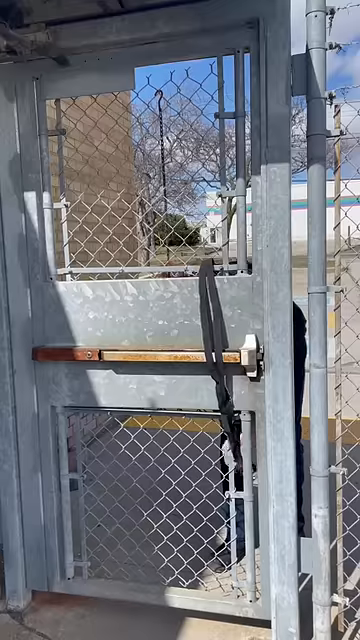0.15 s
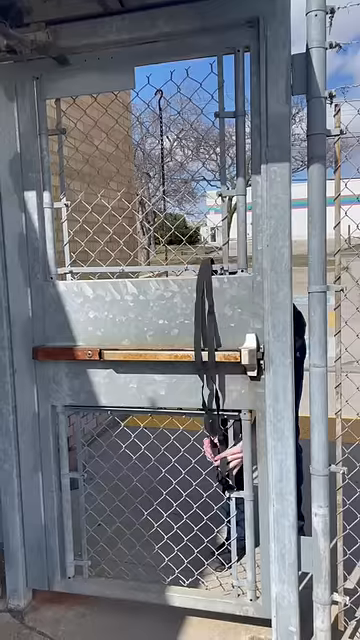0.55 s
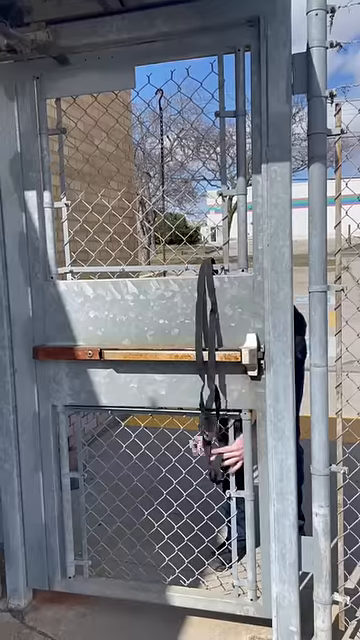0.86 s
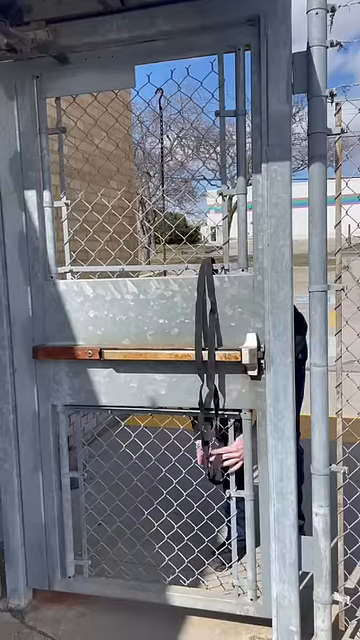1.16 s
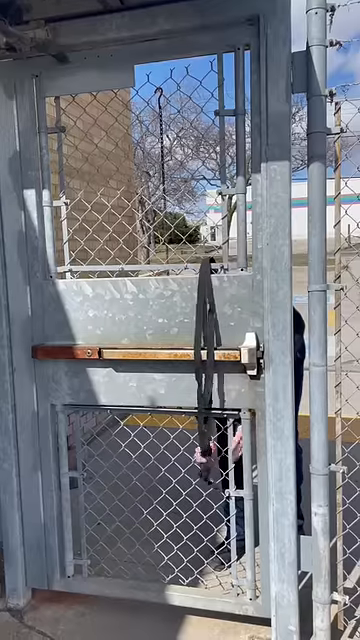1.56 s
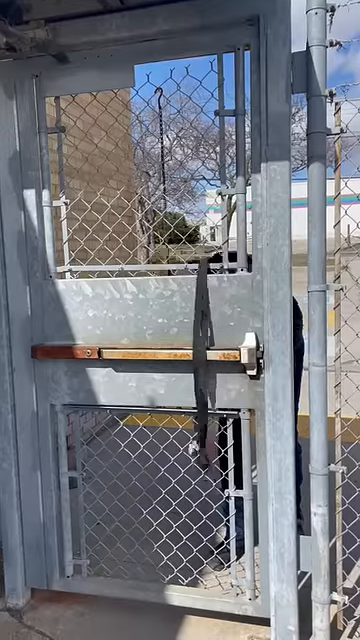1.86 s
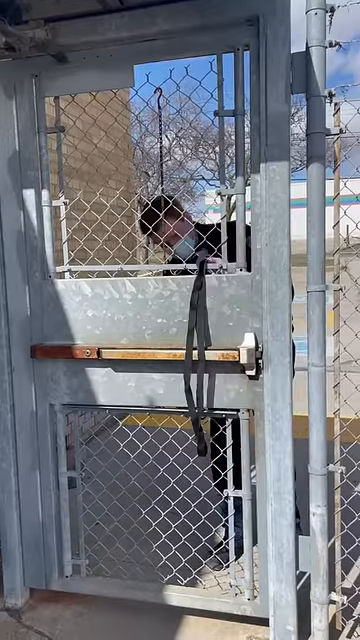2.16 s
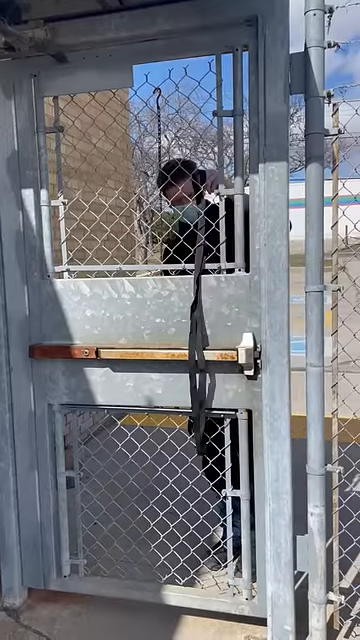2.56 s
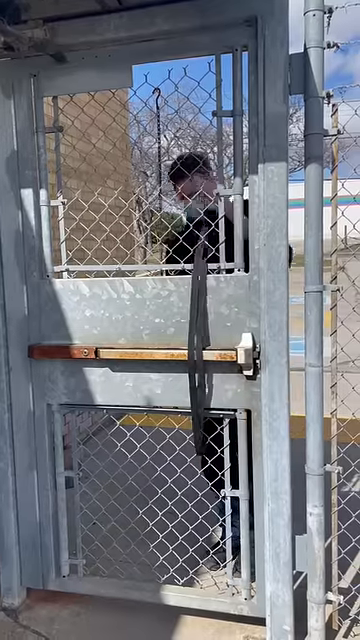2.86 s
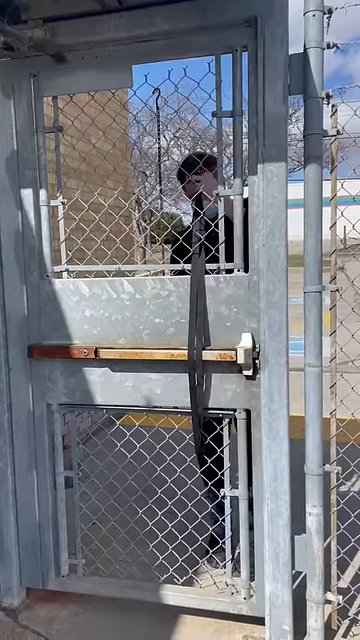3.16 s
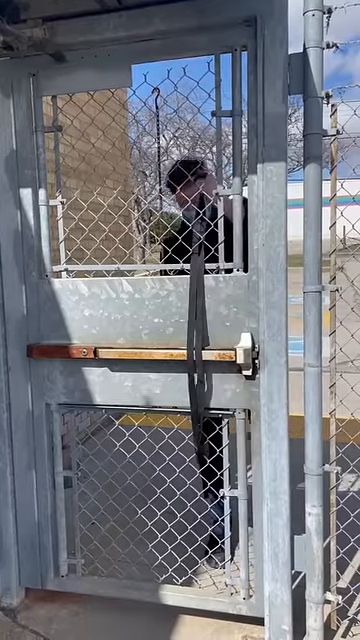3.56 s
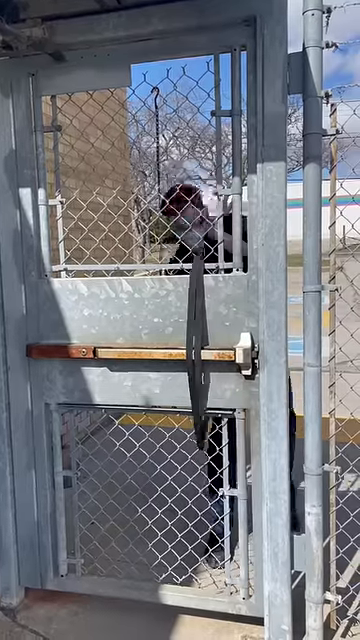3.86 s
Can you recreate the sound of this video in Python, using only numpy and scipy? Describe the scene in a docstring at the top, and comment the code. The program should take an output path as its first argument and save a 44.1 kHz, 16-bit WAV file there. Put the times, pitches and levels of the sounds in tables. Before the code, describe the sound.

A steel mesh gate is tugged by a strap outdoors. From 0 to 3.6 seconds, webbing rustles and rubs faintly on wire, with light ticks and plucks, sharper snaps near 2.7 and 3.06, and tiny metallic tinkles around 2.5 and 3.1. At 3.63 the push bar clanks; from 3.83 the gate crashes loudly, ringing and rattling to the end. Low wind gusts thump the microphone over faint traffic.

```python
"""A strap worked through the wire mesh of a steel gate: random catches make it rustle, dull noise makes it rub.
Single clicks tick the mesh, tinkle a small metal fitting and pluck wires. Then the strap pulls tight:
the push bar clanks and the gate crashes, as random chatter and distinct strikes ring mesh, frame and sheet.
Gusts thump on the microphone as lumpy low noise, over a patchy noise of far traffic outdoors."""
import sys
import numpy as np
from scipy import signal
from scipy.fft import rfft, irfft
from scipy.io import wavfile

SR = 44100
rng = np.random.default_rng(int(sys.argv[2]) if len(sys.argv) > 2 else 0)


def output_pcm(signal):
    """Save a mono or channel-first signal as 16-bit PCM at the path in sys.argv[1].

    Samples are clipped to [-1, 1] before scaling.
    """
    pcm = np.clip(np.atleast_2d(signal).T, -1, 1) * 32767
    wavfile.write(sys.argv[1], SR, np.round(pcm).astype(np.int16))


N = 176400  # length in samples: 4 s

# Strap dragging on the mesh: (time [s], level of the catches [dB], top setting for brighten [dB],
# level of the dull rub [dB])
STRAP_DRAG = [(0.0, -64, -20, -52), (0.06, -67, -13, -62), (0.16, -65, -10.5, -60), (0.18, -59, 1, -74),
              (0.21, -65, -5, -93), (0.43, -60.5, -14, -61.5), (0.72, -68.5, -17, -59),
              (0.94, -74, -18, -62), (0.96, -59.5, -14, -55.5), (1.02, -56.5, -21, -60.5),
              (1.08, -63.5, -29, -58), (1.3, -83, -21, -62), (1.35, -65.5, -0.5, -72),
              (1.39, -60, -12, -66), (1.48, -61.5, -11, -59), (1.53, -54.5, -6, -78), (1.56, -57, -17, -57),
              (1.67, -55, -13, -54.5), (1.74, -57, -12, -58.5), (1.85, -52.5, -16.5, -48),
              (2.09, -60.5, -19.5, -61), (2.15, -58.5, -17.5, -56.5), (2.35, -60.5, -15, -56),
              (2.49, -52.5, -20, -57.5), (2.66, -60.5, -10, -57), (2.68, -46, -14, -61),
              (2.69, -54.5, -12, -70), (2.74, -57, -15, -53), (2.78, -66, -8, -53.5),
              (2.86, -57.5, -15, -55), (2.99, -62, -17, -55.5), (3.0, -57.5, -20, -46.5),
              (3.04, -61.5, -4.5, -55.5), (3.06, -52.5, -18, -55), (3.08, -59, 8.5, -50),
              (3.22, -69, -13, -66), (3.39, -66, -5, -53), (3.41, -71, -7.5, -62.5), (3.59, -61, -9, -53.5),
              (3.62, -69, 11, -71), (3.63, -38, -13, -46)]
# Colour of the catches: (frequency [Hz], level per Hz [dB])
STRAP_COLOUR = [(300, 13), (800, 6), (1500, 4.5), (2500, -4), (4000, -9.5), (5500, -1), (7500, -4),
                (10000, -12), (13000, -23.5), (16000, -20.5)]
# Wires singing under the strap: (frequency [Hz], width [Hz], level [dB])
SINGING_WIRES = [(2070, 42, 8), (2360, 58, 9), (2770, 69, 4), (3012, 86, 5), (3650, 54, 1),
                 (4680, 13.3, 2.5), (5030, 110, -1), (5165, 99, -2)]
CATCHES_PER_S, CATCH_SPREAD_DB, CATCH_TRIM_DB, STRAP_PATCHY_DB = 8000, 3.0, 1, 2.2
STRAP_RING_DB, STRAP_RING_T60_S = -2, 0.068
SINGING_DB, SINGING_WANDER_DB = 4.5, 3.5
RUB_TRIM_DB, RUB_LOW_HZ, RUB_HIGH_HZ = -1.5, 322, 1550


def rustle():
    """Webbing fibres catch the wire thousands of times a second and ring it faintly; the flat strap rubs duller."""
    db, top_db, rub_db = in_time(STRAP_DRAG)
    catches = amp(db + CATCH_TRIM_DB) * grains(CATCHES_PER_S, CATCH_SPREAD_DB)
    hiss = np.std(catches) * unit(bands(catches, STRAP_COLOUR, STRAP_PATCHY_DB))
    hiss = hiss + amp(STRAP_RING_DB) * mesh(catches, STRAP_RING_T60_S)
    for hz, width_hz, level_db in SINGING_WIRES:
        gain = amp(SINGING_DB + level_db + SINGING_WANDER_DB * drift(5.1))
        hiss += gain * band(catches, hz - width_hz / 2, hz + width_hz / 2)
    rub_noise = band(rng.standard_normal((2, N)), RUB_LOW_HZ, RUB_HIGH_HZ)
    return brighten(hiss, top_db) + amp(rub_db + RUB_TRIM_DB) * unit(rub_noise)


# Strap ticking the wire: (time [s], level before the trim [dB])
STRAP_TICKS = [(0.174, -50.5), (0.4204, -51), (0.5077, -48.5), (0.9512, -59), (2.674, -42.5), (2.7266, -43),
               (3.0015, -53), (3.0586, -41.5), (3.0937, -44), (3.247, -52.5), (3.4534, -59), (3.5332, -56),
               (3.5577, -50), (3.606, -49)]
TICK_T60_S, TICK_TRIM_DB = 0.028, 20


def ticks():
    """Each tick is one click that sets the mesh ringing at one of two places."""
    return mesh(at_times(STRAP_TICKS, TICK_TRIM_DB), TICK_T60_S, count=2)


# Touches on the small metal fitting: (time [s], level before the trim [dB])
FITTING_TOUCHES = [(2.499, -39), (3.0794, -34.5), (3.4535, -51)]
# Ringing modes of the fitting: (frequency [Hz], level [dB], time to fade by 60 dB [s])
FITTING_MODES = [(7040, -8, 0.3), (7500, 3, 0.13), (9600, -10, 0.073), (10200, -21, .12),
                 (10280, -1, 0.081), (12800, -8, .1), (13200, -10, .1), (15300, 15, 0.17)]
TINKLE_TRIM_DB = -13
REBOUND_S, REBOUND_DB = 0.03, -13  # the fitting touches again, weaker


def tinkles():
    """Each touch and its rebound ring every mode of the fitting with a strength of its own."""
    rebounds = np.array(FITTING_TOUCHES) + [REBOUND_S, REBOUND_DB]
    touches = np.concatenate([FITTING_TOUCHES, rebounds])
    out = 0
    for hz, db, t60 in FITTING_MODES:
        uneven = rng.normal(0, 2.5, (len(touches), 1)) * [0, 1]  # changes level, not time
        out = out + ring(at_times(touches + [0, db] + uneven, TINKLE_TRIM_DB), hz, t60)
    return out


# Single wires plucked: (time [s], level before the trim [dB], frequency [Hz])
PLUCKS = [(0.174, -46, 3600), (1.6217, -47.5, 3610), (2.1244, -55, 4940), (2.1594, -52, 4970),
          (2.4494, -50, 5230)]
PLUCK_T60_S, PLUCK_TRIM_DB = 0.11, -5


def plucked_wires():
    """Each plucked wire rings one short note."""
    return sum(ring(at_times([(s, db)], PLUCK_TRIM_DB), hz, PLUCK_T60_S) for s, db, hz in PLUCKS)


# The bar clanks: (time [s], mesh level [dB], frame level [dB], sheet level [dB], top setting for brighten [dB])
BAR_CLANKS = [(3.62, -55, -59, -49, -12), (3.63, -51, -54, -40, -14), (3.634, -41.5, -28.5, -38, -11),
              (3.652, -41.5, -31.5, -41, -20), (3.676, -51, -44, -29.5, -18),
              (3.718, -51.5, -45, -35, -7.5), (3.746, -54, -37, -32, -7), (3.782, -43, -50, -46, -6),
              (3.794, -44, -45, -42, -4), (3.804, -53, -45, -37, -2), (3.824, -44.5, -38, -46, -17)]
# The gate crashes: (time [s], mesh level [dB], frame level [dB], sheet level [dB], top setting for brighten [dB])
GATE_CRASH = [(3.826, -38, -44, -43, -15), (3.832, -31, -22.5, -35, -9), (3.854, -15.5, -21.5, -21, -12.5),
              (3.875, -22.5, -24, -22, -18), (3.902, -30, -24, -36, -17.5), (3.908, -23, -24, -24, -11.5),
              (3.93, -20, -40, -27.5, -19), (3.948, -23.5, -30, -31, -12.5),
              (3.966, -25.5, -24, -42, -18.5), (4.0, -34.5, -21.5, -45, -22)]
# Distinct impacts in the shaking: (time [s], level before the gains below [dB], pitch of the clang [Hz])
IMPACTS = [(3.635, -34, 4890), (3.851, -14, 5240), (3.862, -16.5, 5200), (3.872, -16, 3590),
           (3.888, -14.5, 2000), (3.911, -7.5, 6160), (3.934, -10.5, 5300), (3.939, -6.5, 5160),
           (3.941, -5, 5600), (3.947, -5.5, 3590), (3.956, -12.5, 3610)]
PULL_S = BAR_CLANKS[0][0]  # the strap pulls tight
SHAKE_HITS_PER_S, SHAKE_SPREAD_DB = 4000, 2.5
WIRE_T60_S, WIRE_TRIM_DB, IMPACT_MESH_DB = 0.023, 2, -3.5
BODY_FRAME_DB, BODY_SHEET_DB = 2.5, 14.5  # broad clatter of the frame; boom of the sheet


def gate():
    """Loose parts chatter and strike while the gate shakes, driving mesh, frame and sheet."""
    wire_db, frame_db, sheet_db, top_db = in_time(list(BAR_CLANKS) + list(GATE_CRASH))
    chatter = (np.arange(N) >= PULL_S * SR) * grains(SHAKE_HITS_PER_S, SHAKE_SPREAD_DB)
    impacts = at_times(np.array(IMPACTS)[:, :2], IMPACT_MESH_DB)
    wire = mesh(amp(wire_db + WIRE_TRIM_DB) * chatter + impacts, WIRE_T60_S, count=8)
    one_chatter = chatter[0]
    body = band(amp(frame_db + BODY_FRAME_DB) * one_chatter, 310, 1370)
    boom = band(amp(sheet_db + BODY_SHEET_DB) * one_chatter, 180, 570)
    modes = frame_modes(one_chatter, frame_db, sheet_db)
    return brighten(wire, top_db), clangs() + modes + body + boom + snaps()


# Ringing modes of the frame and sheet: (frequency [Hz], level [dB], time to fade by 60 dB [s])
FRAME_MODES = [(228, -5.5, 0.05), (290.6, 4, 0.26), (320, -4.5, 0.46), (452, -23, .15), (520, -18, 0.088),
               (636, -4, 0.14), (686, -7, 0.42), (764, -3, 0.11), (884, -11, 0.11), (1230, -11, 0.15),
               (1340, -2.5, 0.38), (1470, -19, .2), (1754, -9, 0.12), (2040, -4, 0.03)]
FRAME_TRIM_DB, IMPACT_FRAME_DB = 2, -27


def frame_modes(chatter, frame_db, sheet_db):
    """Chatter and uneven impacts ring each mode; chatter in modes up to 400 Hz follows the sheet level."""
    rows, out = np.array(IMPACTS)[:, :2], 0
    for hz, db, t60 in FRAME_MODES:
        uneven = rng.normal(0, 4, (len(rows), 1)) * [0, 1]  # changes level, not time
        impacts = at_times(rows + uneven, IMPACT_FRAME_DB)
        level_db = frame_db if hz > 400 else sheet_db
        # Dividing by the ring length keeps long modes from building up
        shaken = amp(level_db + FRAME_TRIM_DB) * chatter / np.sqrt(t60 * SR)
        out = out + amp(db) * ring(shaken + impacts, hz, t60)
    return out


CLANG_DB, CLANG_T60_S, CLANG_SPREAD = -15.5, 0.064, 0.09  # spread: fraction of the pitch


def clangs():
    """Each impact rings four notes scattered round its pitch."""
    detune = 1 + CLANG_SPREAD * rng.normal(0, 1, (len(IMPACTS), 4))
    out = 0
    for (s, db, hz), factors in zip(IMPACTS, detune):
        click = at_times([(s, db)], CLANG_DB)
        out = out + sum(ring(click, hz * factor, CLANG_T60_S) for factor in factors)
    return out


# Sharp metal-on-metal snaps: (time [s], level before the band-pass [dB])
METAL_SNAPS = [(2.6752, -38), (2.678, -20), (2.728, -32), (3.0065, -41), (3.060, -30), (3.6315, -27),
               (3.8316, -2.5), (3.8323, -3), (3.8542, -5), (3.8634, -14), (3.8905, -17), (3.906, -3),
               (3.939, 5), (3.9465, -16)]


def snaps():
    """Each snap is a click cut to a broad band, with no long ring."""
    return band(at_times(METAL_SNAPS, 0), 1600, 8700)


# Pitched knocks on the frame: (time [s], level before the trim [dB], middle frequency [Hz],
# time to fade by 60 dB [s])
FRAME_KNOCKS = [(1.813, -42.5, 1230, 0.065), (2.045, -40, 800, 0.027), (2.735, -51, 650, 0.91),
                (3.632, -31.5, 635, 0.16), (3.632, -46.5, 1830, 0.072), (3.636, -36.5, 2070, 0.22),
                (3.64, -32.5, 397, .3), (3.845, -34, 2050, .12), (3.845, -22.5, 1797, 0.18),
                (3.845, -30, 2360, 0.13), (3.861, -19.5, 528, 0.16), (3.861, -18.5, 326, 0.14),
                (3.88, -21, 286.4, 0.43), (3.91, -26.5, 257, 0.14), (3.925, -24.5, 747, 0.7),
                (3.932, -30.5, 673, 0.5), (3.942, -24.5, 1336, 0.43), (3.938, -32, 1450, 0.34),
                (3.94, -39, 2070, .12)]
KNOCK_SPLIT = 0.033  # gap between the two notes, as a fraction of the frequency


def knocks():
    """A knocked tube of the frame rings two close notes that beat together."""
    out = 0
    for s, db, hz, t60 in FRAME_KNOCKS:
        click = at_times([(s, db)], -6)
        out = out + sum(ring(click, hz * (1 + k * KNOCK_SPLIT), t60) for k in (-.5, .5))
    return out


# Wind on the microphone: (time [s], level [dB])
WIND_GUSTS = [(0.0, -31), (0.17, -39), (0.23, -52), (0.26, -49), (0.76, -57.5), (0.81, -46), (0.83, -34.5),
              (0.91, -26), (0.96, -52.5), (1.06, -37), (1.12, -42.5), (1.16, -32.5), (1.2, -51),
              (1.27, -39), (1.3, -52.5), (1.38, -48.5), (1.43, -34.5), (1.46, -47), (1.48, -42),
              (1.53, -45), (1.65, -40.5), (1.68, -34.5), (1.76, -33.5), (1.79, -51), (1.89, -45.5),
              (1.98, -54), (2.26, -42), (2.28, -55), (2.6, -51.5), (2.73, -46), (2.76, -49), (2.81, -44),
              (2.87, -51), (2.91, -44.5), (3.19, -50.5), (3.25, -57), (3.26, -47.5), (3.45, -44),
              (3.5, -43), (3.52, -53), (3.59, -35), (3.64, -37), (3.85, -42), (3.93, -35), (4.0, -65)]
# Colour of the wind: (frequency [Hz], level per Hz [dB])
WIND_COLOUR = [(30, -27.5), (60, 5), (120, 1.5), (250, -14.5), (450, -34.5), (700, -47)]
# Sharp pressure jumps inside the gusts: (time [s], level before the trim [dB], frequency [Hz])
WIND_BUFFETS = [(0.03, -33, 250), (0.064, -27.5, 326), (0.127, -26, 233), (0.178, -34, 266),
                (0.837, -28, 240), (0.892, -30.5, 250), (0.907, -28.5, 340), (1.094, -40, 275),
                (1.15, -35, 213), (1.173, -35, 213), (1.259, -42, 250), (1.414, -33, 288),
                (1.471, -37, 215), (1.589, -35, 229), (1.621, -35.5, 323), (1.665, -32, 230),
                (1.7, -37, 215), (2.199, -34.5, 255), (2.719, -39, 275), (2.814, -32.5, 208),
                (3.068, -38, 337), (3.271, -40.5, 318), (3.37, -29.5, 211), (3.463, -36, 211)]
WIND_LUMPS_DB, WIND_LUMPS_HZ, WIND_PATCHY_DB = 3.5, 25.8, 2.24
WIND_BRIGHTENS = 0.0064  # dB per octave for each dB of gust
WIND_SIDE_DB, WIND_TOP_HZ = -16, 670
BUFFET_T60_S, BUFFET_TRIM_DB = 0.03, 3


def wind():
    """Lumpy pressure noise with sharp buffets, nearly the same in left and right."""
    db, = in_time(WIND_GUSTS)
    db = db + WIND_LUMPS_DB * drift(WIND_LUMPS_HZ)
    tilt_db = WIND_BRIGHTENS * (db - db.mean())
    noise = bands(rng.standard_normal((2, N)), WIND_COLOUR, WIND_PATCHY_DB, tilt_db)
    mid, side = amp(db) * unit(noise)
    for s, buffet_db, hz in WIND_BUFFETS:
        mid = mid + ring(at_times([(s, buffet_db)], BUFFET_TRIM_DB), hz, BUFFET_T60_S)
    stereo = mid + amp(WIND_SIDE_DB) * side * [[1], [-1]]
    return signal.sosfilt(signal.butter(6, WIND_TOP_HZ, fs=SR, output="sos"), stereo)


# Colour of the far traffic: (frequency [Hz], level per Hz [dB])
TRAFFIC_COLOUR = [(30, -31), (60, 1), (200, -3), (800, -10), (1600, -25), (3300, -32.5), (6500, -38),
                  (16000, -55)]
TRAFFIC_DB, TRAFFIC_PATCHY_DB = -55, 1.3


def traffic():
    """Far traffic: steady, slightly patchy noise, strongest in the bass."""
    noise = rng.standard_normal((2, N))
    return amp(TRAFFIC_DB) * unit(bands(noise, TRAFFIC_COLOUR, TRAFFIC_PATCHY_DB))


# Colour of the wire mesh: (frequency [Hz], level per Hz [dB])
MESH_COLOUR = [(800, 1), (1500, -1.5), (2500, 2), (3700, -1.5), (5200, -0.5), (6500, -7.5), (7500, -5.5),
               (10000, -13.5), (13000, -19), (16000, -13)]


def mesh(hits, t60, count=1):
    """Wire mesh of 500 short rings, shorter when higher; hits land on places, each with its own mix of ring signs."""
    hz = np.geomspace(700, 16000, 500)[:, None] * rng.uniform(.998, 1.002, (500, 1))
    t = np.arange(int(.15 * SR)) / SR
    lasts = t60 * np.sqrt(3000 / hz)  # t60 holds at 3000 Hz
    heights = amp(at_hz(MESH_COLOUR, hz) - 60 * t / lasts) * np.sqrt(hz / lasts)
    rings = heights * np.sin(2 * np.pi * hz * t)
    hits = np.broadcast_to(hits, (2, N))
    first = np.flatnonzero(hits.any(axis=0))[0]
    place, out = rng.integers(0, count, N), np.zeros((2, N))
    for k in range(count):
        reply = rng.choice([-1, 1], (2, len(hz))) @ rings
        reply = unit(reply) / np.sqrt(len(t))  # energy 1, averaged over the two channels
        here = (hits * (place == k))[:, first:]
        out[:, first:] += signal.fftconvolve(here, reply, axes=1)[:, :N - first]
    return out


# Stereo phase between left and right: (frequency [Hz], phase difference [rad])
STEREO_PHASE = [(100, 0), (1500, .8), (3000, 1.6), (5000, .4), (6300, .8), (7000, np.pi), (8600, np.pi),
                (9800, 2 * np.pi), (12300, 2 * np.pi), (13200, 3 * np.pi), (15000, 3 * np.pi),
                (15800, 3.5 * np.pi)]
# Likeness of left and right for a wide source: (frequency [Hz], likeness from 0 to 1)
STEREO_LIKENESS = [(100, 1), (300, 0.93), (700, 0.54), (1500, 0.17), (3000, 0.1), (5000, 0.48),
                   (6300, 0.28), (7000, 0.99), (16000, 1)]


def stereo_image(spread, point):
    """Left and right differ in phase by frequency; only wide sources also lose likeness."""
    hz = np.maximum(np.arange(N // 2 + 1) * SR / N, 1)
    (first, second), both = rfft(spread), rfft(point)
    alike = np.clip(at_hz(STEREO_LIKENESS, hz), 0, 1)
    turn = np.exp(.5j * at_hz(STEREO_PHASE, hz))  # half the difference for each side
    left = (first + both) * turn
    right = (alike * first + np.sqrt(1 - alike ** 2) * second + both) / turn
    return irfft([left, right], N)


def amp(db):
    """dB to gain."""
    return 10 ** (np.asarray(db) / 20)


def unit(x):
    """Scale to rms 1."""
    return x / np.sqrt(np.mean(x ** 2) + 1e-20)


def in_time(rows):
    """Table columns joined by straight lines in time."""
    s, *columns = np.transpose(rows)
    return [np.interp(np.arange(N) / SR, s, c) for c in columns]


def at_hz(points, hz):
    """Table read on a log-frequency axis."""
    table_hz, values = np.array(points).T
    return np.interp(np.log(hz), np.log(table_hz), values)


def at_times(rows, trim_db):
    """One click for each row of time and level."""
    clicks = np.zeros(N)
    s, db = np.transpose(rows)
    clicks[(s * SR).astype(int)] = amp(db + trim_db)
    return clicks


def drift(hz):
    """Slow random wander of rms 1, made at every 40th sample."""
    r = np.exp(-80 * np.pi * hz / SR)
    noise = rng.standard_normal(N // 40 + 2002)
    slow = signal.lfilter([1], [1, -2 * r, r * r], noise)[2000:]  # drop the filter's start
    return np.interp(np.arange(N) / 40, np.arange(len(slow)), unit(slow))


def ring(clicks, hz, t60):
    """A unit click sets a fading sine of starting height about 1 ringing."""
    r, w = amp(-60 / (t60 * SR)), 2 * np.pi * hz / SR
    return signal.lfilter([0, np.sin(w)], [1, -2 * r * np.cos(w), r * r], clicks + 1e-18)


def grains(per_s, spread_db):
    """Random clicks of uneven size and sign, drawn separately for two channels; rms 1."""
    sizes = amp(spread_db * np.minimum(rng.exponential(1, (2, N)), 4))
    signs = rng.choice([-1, 1], (2, N))
    return unit(sizes * signs * (rng.random((2, N)) < per_s / SR))


def bands(x, colour, patchy_db, tilt_db=0.0):
    """Half-octave bank: each band has its own level and flicker; tilt in dB per octave above 100 Hz."""
    octaves = np.log2(colour[-1][0] / colour[0][0])
    edges = colour[0][0] * 2 ** np.arange(0, octaves + .5, .5)
    out, together = 0, drift(3.0)
    for low, high in zip(edges, edges[1:]):
        hz = np.sqrt(low * high)
        flicker_db = patchy_db * (.6 * together + drift(12))
        gain = amp(at_hz(colour, hz) + flicker_db + tilt_db * np.log2(hz / 100))
        out = out + gain * band(x, low, min(high, .45 * SR))
    return out


def band(x, low_hz, high_hz):
    """Band-pass."""
    return signal.sosfilt(signal.butter(2, [low_hz, high_hz], "band", fs=SR, output="sos"), x)


TOP_HZ, TOP_USUAL_DB = 6780, -13  # where the top starts; the setting that leaves it unchanged


def brighten(x, top_db):
    """Raises or lowers the top of the sound, leaving the rest."""
    low = signal.sosfiltfilt(signal.butter(4, TOP_HZ, fs=SR, output="sos"), x)
    return low + amp(top_db - TOP_USUAL_DB) * (x - low)


def scene():
    """All sources through the stereo image; the wind acts on the microphone itself."""
    before_pull = np.arange(N) < PULL_S * SR
    wire, frame = gate()
    spread = rustle() * before_pull + ticks() + wire + traffic()
    point = tinkles() + plucked_wires() + frame + knocks()
    return stereo_image(spread, point) + wind()


CUTOFF_HZ = 16300


def record(dry):
    """A steep low-pass cuts the top."""
    return signal.sosfilt(signal.cheby2(12, 70, CUTOFF_HZ, fs=SR, output="sos"), dry)


dry = scene()
out = record(dry)
output_pcm(out)
```